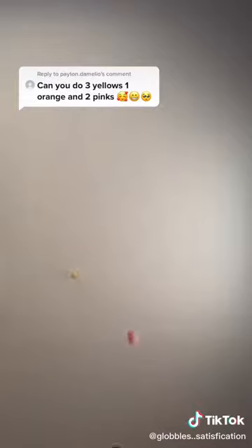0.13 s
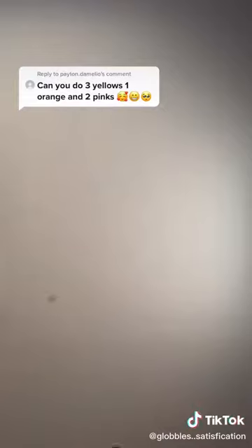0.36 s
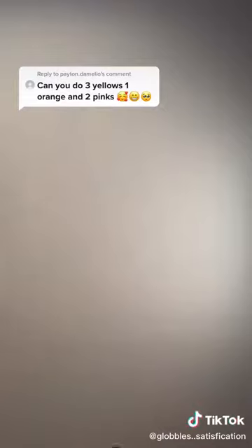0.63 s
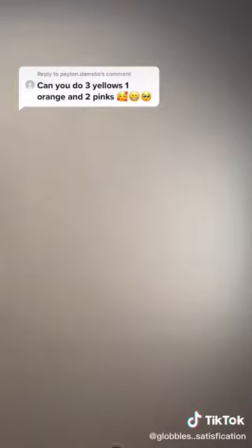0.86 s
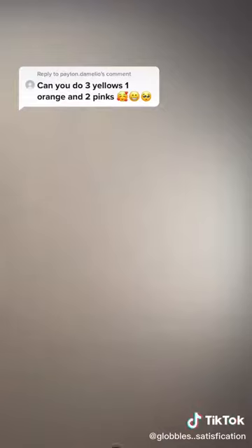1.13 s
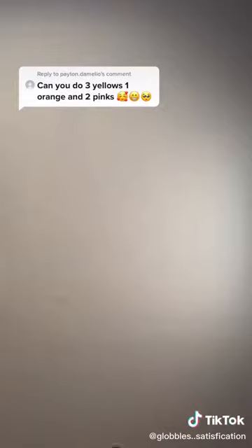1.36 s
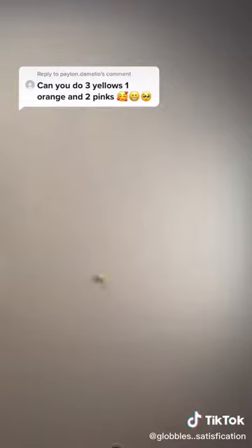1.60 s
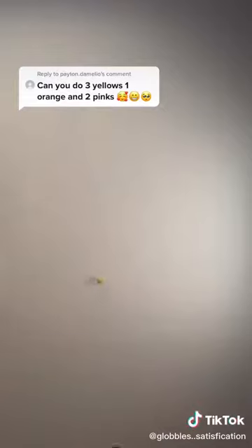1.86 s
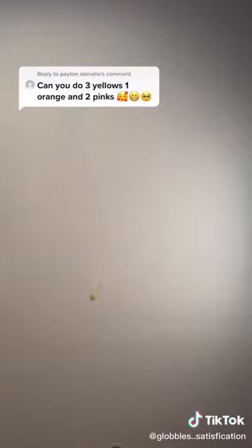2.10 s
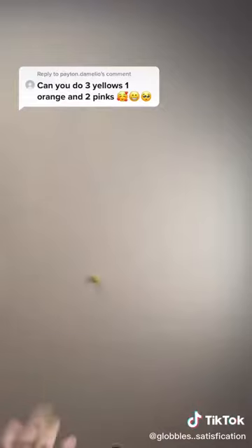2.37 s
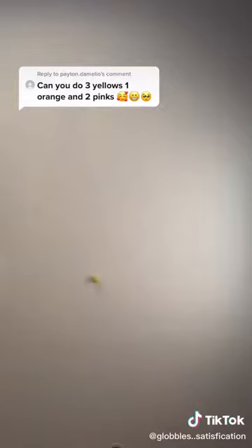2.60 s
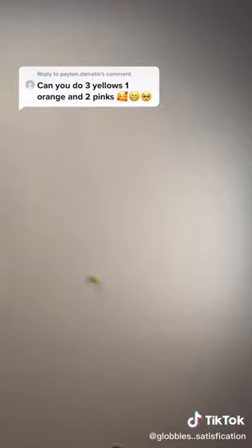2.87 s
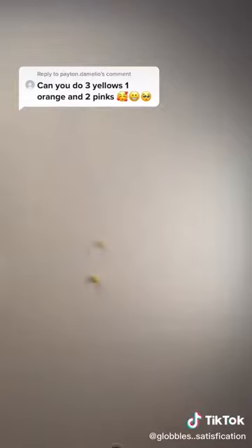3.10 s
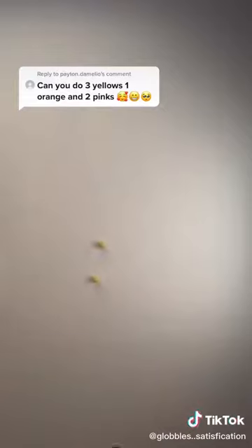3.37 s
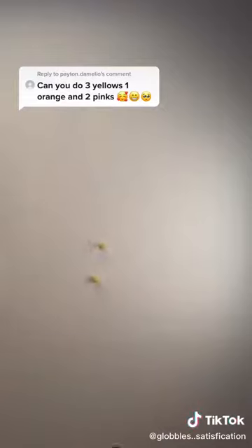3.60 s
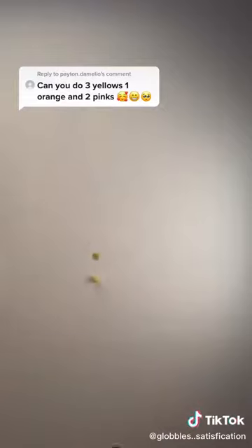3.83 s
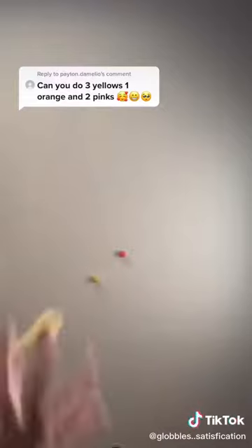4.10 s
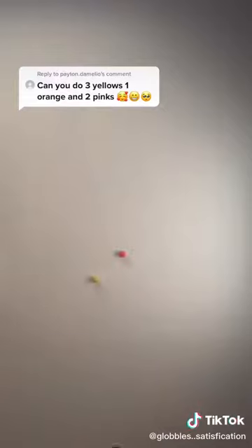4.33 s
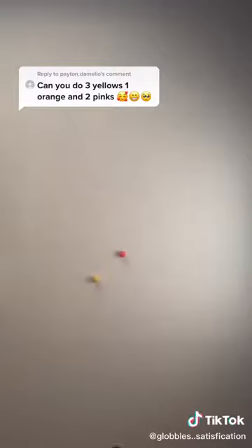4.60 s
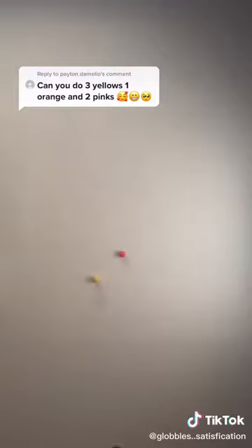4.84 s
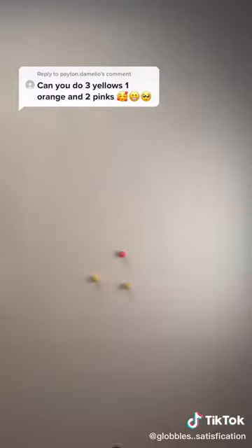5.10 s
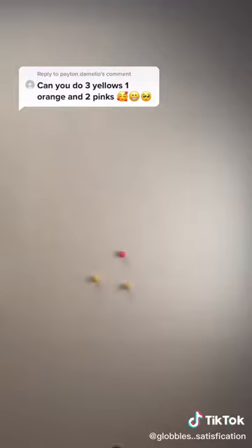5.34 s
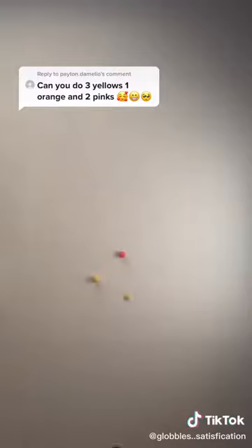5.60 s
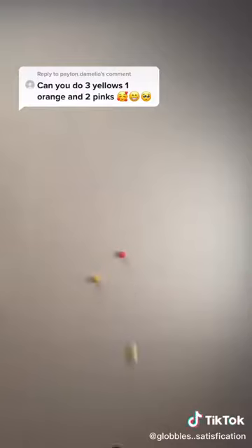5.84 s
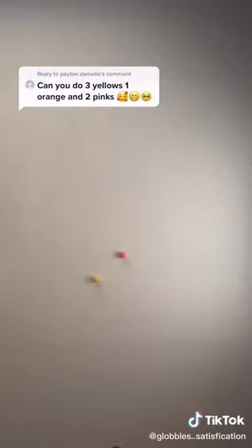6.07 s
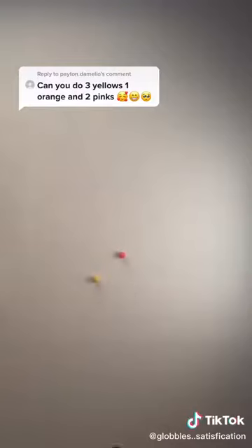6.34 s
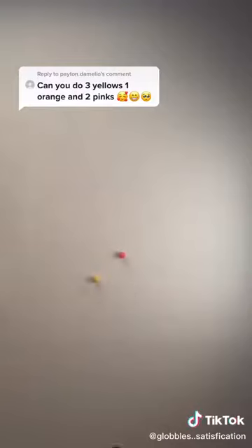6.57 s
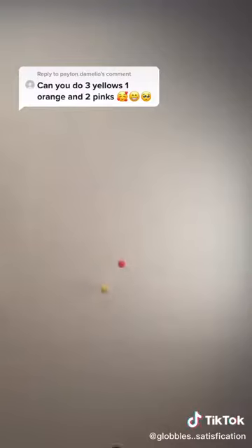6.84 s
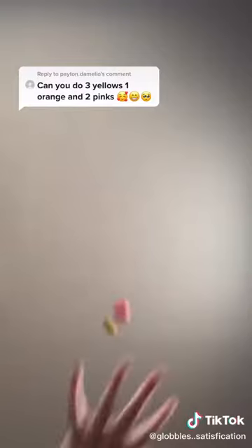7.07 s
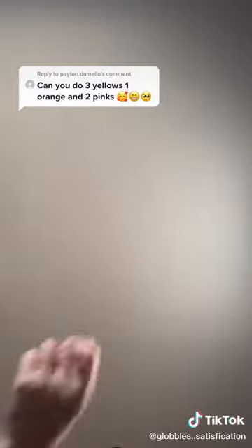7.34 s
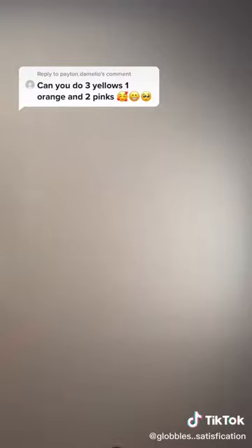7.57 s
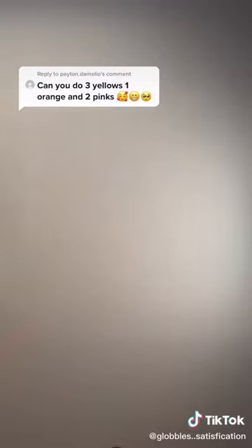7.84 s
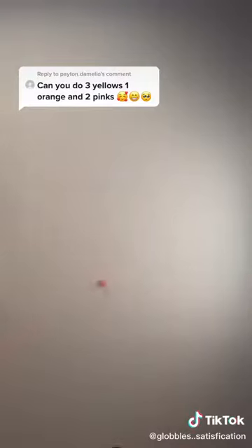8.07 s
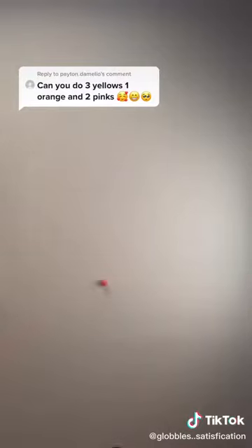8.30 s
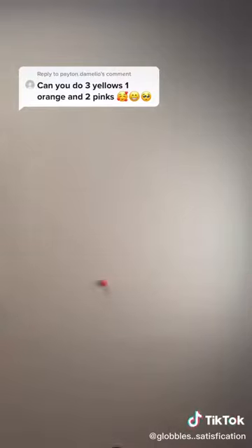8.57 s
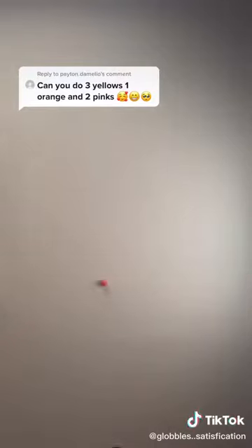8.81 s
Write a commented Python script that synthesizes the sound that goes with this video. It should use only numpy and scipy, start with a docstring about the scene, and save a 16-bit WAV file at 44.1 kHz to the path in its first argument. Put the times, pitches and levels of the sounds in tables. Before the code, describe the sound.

Sticky gel balls crack and slap against a hollow ceiling with a short boom, then pop back into a cupped hand in a quiet room.

```python
"""Sticky balls on a hollow ceiling

A quiet furnished room: gel balls are thrown up against the board overhead and caught again.
Each hit is a bright crack and slap, then the board booms in decaying modes; catches pop in a cupped hand.
Sticky skin ticks and rubs as short clicks and noise; swings of the arm swell as rumble, rustle and hiss.
Steady noise and a wavering hum lie behind; the phone microphone lets the bass arrive late."""
import sys
import numpy as np
from scipy import signal
from scipy.fft import rfft, irfft, next_fast_len
from scipy.io import wavfile

SR = 44100
rng = np.random.default_rng(int(sys.argv[2]) if len(sys.argv) > 2 else 0)


def put_to_file(sound):
    """Save the sound as 16-bit audio at rate SR, in the file named by the first command-line argument."""
    columns = np.atleast_2d(sound).T  # one column per channel
    safe = np.clip(columns, -1, 1)
    whole_steps = np.round(safe * 32767)
    wavfile.write(sys.argv[1], SR, whole_steps.astype(np.int16))


def rack_gain(trim_db):
    """Turn a fader trim in dB into the linear factor to multiply a signal by."""
    fader = np.asarray(trim_db, float)
    return 10 ** (fader / 20)


N = 394254  # length in samples

# ball hits the ceiling: [t/s, crack level/dB, deep mode level/dB, boom mode level/dB]
CEILING_HITS = [(1.4949, -13, -37, -23), (2.1871, -9, -34.5, -18.5), (3.1236, -12.5, -23.5, -17),
                (4.0773, -8.5, -28, -16.5), (4.9319, -11, -38, -19), (6.6264, -15.5, -35.5, -20),
                (8.0944, -13, -34.5, -20)]
# modes of ceiling board and room: [f/Hz, level/dB relative to their group, t60/s]
CEILING_MODES = [(82.3, -6.5, 1.1), (82.3, -11.5, 1.09), (98, 7.5, 0.55), (139.8, -1, 0.21),
                 (157.9, 5.5, 0.18), (184.3, -2, 0.26), (209, -37, 0.69), (236, 3.5, 0.4),
                 (270.6, -9, 0.38), (326.4, -6.5, 0.41), (363, -9, 0.3)]
# colour of ball on board: [f/Hz, relative level/dB per Hz]
BOARD_CRACK_COLOUR = [(600, -26), (1000, -39), (2000, 15), (3500, 4), (5000, -6.5), (8000, 1.5),
                      (11500, -1), (14500, -13), (16400, -38)]
# ball lands in the hand or on another ball:
# [t/s, crack level/dB, cup f/Hz, cup level/dB, puff level/dB, snap level/dB]
CATCHES = [(0.2936, -29.5, 570, -13.5, -31, -16.5), (0.5789, -29.5, 694, -11.5, -27, -20.5),
           (2.3871, -18.5, 530, -18.5, -23, -13.5), (3.3111, -44, 627, -23.5, -46, -17),
           (4.131, -16.5, 582, -8.5, -13, -10), (5.222, -44, 840, -39, -60, -32),
           (5.239, -40.5, 825, -23.5, -34.5, -32), (5.2518, -56, 520, -20, -61, -22.5),
           (5.9606, -20.5, 610, -7.5, -22, -7.5), (7.1513, -27.5, 597, -18.5, -20.5, -15),
           (7.2694, -23, 674, -16.5, -36, -20), (7.2764, -44, 480, -24.5, -64, -18.5),
           (8.199, -44, 514, -31, -28, -28), (8.207, -42, 248, -53, -30, -29),
           (8.268, -47, 790, -29.5, -47, -21.5), (8.3317, -41, 793, -17, -55, -21),
           (8.3297, -51, 380, -19.5, -52, -34)]
# fingers close on a ball or let it go: [t/s, cup f/Hz, cup level/dB, puff level/dB]
FINGER_TOUCHES = [(0.044, 570, -46.5, -49), (0.8644, 630, -58, -67), (0.9248, 566, -40.5, -61),
                  (1.243, 640, -39.5, -43), (1.2806, 390, -36.5, -31), (1.7837, 695, -37.5, -33.5),
                  (1.9997, 306, -55, -27), (2.6514, 635, -43.5, -62), (2.911, 272, -34.5, -58),
                  (3.6254, 627, -47.5, -42), (3.8944, 360, -46, -28), (4.4054, 650, -44.5, -56),
                  (4.6865, 580, -42, -62), (4.7512, 420, -33, -30), (5.1834, 590, -39.5, -39),
                  (5.481, 700, -44, -61), (5.6029, 256, -34.5, -50), (6.398, 723, -45, -67),
                  (6.4544, 270, -43, -62), (6.7754, 616, -38.5, -40), (7.5954, 634, -47, -45.5),
                  (7.835, 580, -43.5, -55), (7.918, 264, -39, -24.5), (8.5389, 686, -42, -55),
                  (8.8957, 576, -40.5, -42)]
# sticky skin lets go with a dry tick: [t/s, crack level/dB, snap level/dB]
STICKY_TICKS = [(2.497, -48, -56), (2.597, -54, -56), (3.243, -46, -55), (3.255, -43, -55),
                (3.288, -40.5, -50), (3.44, -50, -60), (3.5279, -48.5, -30.5), (4.252, -64, -33),
                (4.737, -62, -37), (4.906, -50, -45), (5.479, -59, -42), (7.755, -49, -58),
                (7.895, -48, -55), (8.776, -53, -42), (8.919, -60, -32.5)]
# brief dry rubs of skin on gel: [t/s, length/s, centre f/Hz, level/dB]
SKIN_RUBS = [(1.788, 0.039, 2170, -58.5), (5.21, 0.071, 2130, -47.5), (5.594, 0.048, 2240, -55.5),
             (6.214, 0.037, 2200, -53), (8.733, 0.043, 2270, -56)]
# colour of ball on skin: [f/Hz, relative level/dB per Hz]
SKIN_CRACK_COLOUR = [(2000, -26), (3500, -26), (5000, 6.5), (8000, 13.5), (11500, 16), (14500, -3),
                     (16400, -15)]
# arm movements, the strong ones are throws:
# [fastest moment t/s, rumble level/dB, rustle level/dB, hiss level/dB]
ARM_SWINGS = [(.115, -78, -65.5, -73), (.935, -94, -61.5, -78), (1.294, -50.5, -56, -61.5),
              (1.69, -57, -53.5, -69), (2.013, -46.5, -54, -61.5), (2.55, -62, -57, -65),
              (2.902, -52.5, -56.5, -62.5), (3.89, -46.5, -57.5, -59.5), (4.01, -77, -84, -72),
              (4.4, -55, -90, -69), (4.751, -47, -55, -61.5), (5.4, -62, -65, -69),
              (5.61, -60.5, -75, -106), (6.47, -54.5, -58, -61.5), (7.01, -64, -77, -80),
              (7.46, -70, -67, -73), (7.57, -68, -68, -77), (7.72, -74, -71, -83), (7.923, -53, -54, -63),
              (8.6, -61, -77, -78), (8.912, -57.5, -61, -63)]
# how each sound of a swing swells and sinks: [rise/(dB/s), fall/(dB/s), level at rest/dB, hold/s]
# hold: full level is reached this long before the fastest moment; if negative, rise and fall overlap
RUMBLE_SWELL = (209, 227, -61.5, 0.0529)
RUSTLE_SWELL = (204, 274, -70.5, 0.022)
HISS_SWELL = (214, 189, -85.5, -0.0432)
# colours of air buffeting the microphone, of rustling cloth and of hiss: [f/Hz, relative level/dB per Hz]
RUMBLE_COLOUR = [(13, -18), (22, 3.5), (70, 7.5), (103, 3.5), (129, 0.5), (259, -2.5), (350, -13.5),
                 (460, -42), (770, -120)]
RUSTLE_COLOUR = [(250, -24), (400, 0.5), (650, 1), (1100, -11), (2500, -18.5), (4500, -32), (7000, -48.5)]
HISS_COLOUR = [(3000, -25), (5000, -10), (7000, -5), (9500, 0), (12300, 0), (14500, -10), (15600, -25)]
# colour of the steady room and microphone noise: [f/Hz, relative level/dB per Hz]
AIR_COLOUR = [(13, -44), (22, 4.5), (85, 2), (143, -29.5), (242, -8), (328, -9.5), (636, -24.5),
              (935, -17.5), (2320, -19.5), (5030, -31.5), (11800, -30.5), (14700, -38), (16000, -49)]
# course of the hum: [t/s, level/dB]
HUM_COURSE = [(0, -72), (2.5, -52), (3.6, -57), (5.8, -54), (6.3, -87), (8.94, -76)]
# reverberation of the furnished room: [f/Hz, t60/s, relative level/dB]
ROOM_DECAY = [(93, 0.5, -13.5), (193, 0.38, -14), (356, 0.32, -10.5), (480, 0.25, -4.5), (700, 0.33, -10.5),
              (1000, 0.24, -4), (2950, 0.29, -8.5), (4140, 0.26, -10), (5250, 0.23, -7),
              (7800, 0.21, -15.5), (14500, 0.16, -9.5)]

# hit on the ceiling; slap and knock (upper modes) are relative to the crack
SLAP_HZ, SLAP_T60_S, SLAP_DB, KNOCK_DB = 657, 0.0085, 3.5, -17
SPREAD_S, SPREAD_DB = 0.0023, -1  # the ball spreads flat: delay, level relative to the touch
BOARD_LAG_S, FLOOR_ECHO_S = 0.00295, 0.0172
CLICK_RISE = 16  # samples before the centre of a crack

# hand and sticky skin
CUP_CYCLES, PUFF_HZ, PUFF_T60_S = 3.78, 180, 0.031  # each cup resonance has its t60 in cycles
SNAP_HZ, SNAP_T60_S = 1375, 0.0016
SNAP_BAND_HZ = 243, 14700  # the soft skin moves no air below and snaps no faster than this
PATTER_S, PATTER_DB = 0.003, -5  # later patches of contact: longest delay, level before random sizes
TOUCH_CRACK_DB, TOUCH_SNAP_DB = -24, -4  # relative to the cup
SLEEVE_HISS_DB, SLEEVE_HISS_T60_S = -28, 0.2  # starting level relative to the crack

# room, background and microphone
LATE_DB, LATE_STRETCH = -22, 3.42  # lingering part of the reverberation: level, times longer t60
AIR_DB = -62
HUM_HZ, OVERTONE_DB = 97.8, -17
BASS_LAG_CYCLES, LAG_KNEE_HZ = 1.367, 48.7

# third-octave bands for the reverberation
EDGES_HZ = 70 * 2 ** np.arange(0, 8.1, 1 / 3)
BANK = [signal.butter(2, band, "band", fs=SR, output="sos") for band in zip(EDGES_HZ, EDGES_HZ[1:])]
UNIT_CLICK = np.eye(1, 32768)[0]


def board_modes(deep_db, boom_db, knock_db, spot_db):
    """A blow sets the hollow board ringing in decaying modes; each group has its own push."""
    board = 0
    for (hz, mode_db, t60), chance_db in zip(CEILING_MODES, spot_db):
        push_db = deep_db if hz < 115 else boom_db if hz < 200 else knock_db
        board = board - rack_gain(push_db + mode_db + chance_db) * ring(UNIT_CLICK, hz, t60)
    return board


def ceiling():
    """The ball touches, spreads flat a moment later and pushes the board; the floor answers once."""
    out = np.zeros(N)
    # every spot drives the modes a little differently
    spots_db = 2.5 * rng.standard_normal((len(CEILING_HITS), len(CEILING_MODES)))
    board_fade = np.exp(-np.arange(len(UNIT_CLICK)) / (0.0088 * SR))
    for (s, crack_db, deep_db, boom_db), spot_db in zip(CEILING_HITS, spots_db):
        touch = rack_gain(crack_db) * crack(BOARD_CRACK_COLOUR)
        slap = rack_gain(crack_db + SLAP_DB) * ring(UNIT_CLICK, SLAP_HZ, SLAP_T60_S)
        near = touch + slap
        spread = -rack_gain(SPREAD_DB) * np.roll(touch, round(SPREAD_S * SR))
        board = board_modes(deep_db, boom_db, crack_db + KNOCK_DB, spot_db)
        add(out, near + spread + room(rack_gain(6.5) * near), s)
        add(out, rack_gain(-10.5) * touch, s + FLOOR_ECHO_S)
        # only the onset of the boom feeds the reverberation
        add(out, board + room(rack_gain(4.0) * board * board_fade), s + BOARD_LAG_S)
    return out


def hand():
    """Catches, finger touches, ticks and rubs of the sticky skin, together."""
    return cupped_pops() + sticky_ticks() + skin_rubs()


def cupped_pops():
    """The cupped palm rings briefly over a low puff of air; the sleeve hisses on as the catch dies away."""
    out = np.zeros(N)
    touches = [(s, cup_db + TOUCH_CRACK_DB, hz, cup_db, puff_db, cup_db + TOUCH_SNAP_DB)
               for s, hz, cup_db, puff_db in FINGER_TOUCHES]
    sleeve_noise = rms_one(coloured(rng.standard_normal(len(UNIT_CLICK)), HISS_COLOUR))
    sleeve_hiss = sleeve_noise * rack_gain(-60 * np.arange(len(UNIT_CLICK)) / SR / SLEEVE_HISS_T60_S)
    push = np.diff(UNIT_CLICK, prepend=0)
    for s, crack_db, hz, cup_db, puff_db, snap_db in CATCHES + touches:
        # palm and ball resonate together
        cup = ring(ring(push, hz, CUP_CYCLES / hz), hz, CUP_CYCLES / hz)
        pop = skin(crack_db, snap_db)
        pop += rack_gain(cup_db) * cup / np.abs(cup).max()
        pop += rack_gain(puff_db) * ring(UNIT_CLICK, PUFF_HZ, PUFF_T60_S)
        add(out, pop + room(rack_gain(-2) * pop) + rack_gain(crack_db + SLEEVE_HISS_DB) * sleeve_hiss, s)
    return out


def sticky_ticks():
    """Sticky skin lets go with a dry tick, which the room answers."""
    out = np.zeros(N)
    for s, crack_db, snap_db in STICKY_TICKS:
        tick = skin(crack_db, snap_db)
        add(out, tick + room(rack_gain(-1) * tick), s)
    return out


def skin_rubs():
    """Skin rubs on gel: short resonant noise that swells and sinks, without reverberation."""
    out = np.zeros(N)
    for s, length, hz, db in SKIN_RUBS:
        noise = ring(ring(rng.standard_normal(4096), hz, .002), hz, .002)
        noise = noise[-round(length * SR):]
        add(out, rack_gain(db) * rms_one(noise) * np.hanning(len(noise)), s)
    return out


def skin(crack_db, snap_db):
    """Sticky skin meets skin: a crack and a duller snap, repeated by three later patches of contact."""
    band = signal.butter(2, SNAP_BAND_HZ, "band", fs=SR, output="sos")
    snap = signal.sosfilt(band, ring(UNIT_CLICK, SNAP_HZ, SNAP_T60_S))
    first = rack_gain(crack_db) * crack(SKIN_CRACK_COLOUR) - rack_gain(snap_db) * snap
    lags = rng.random(3) * PATTER_S * SR
    sizes = rng.standard_normal(3)
    later = sum(size * np.roll(first, round(lag)) for lag, size in zip(lags, sizes))
    return first + rack_gain(PATTER_DB) * later


def crack(colour):
    """The sticky skin snaps on contact: one bright click of height 1."""
    pulse = coloured(np.roll(UNIT_CLICK, CLICK_RISE), colour)
    pulse = pulse * np.exp(-np.arange(len(UNIT_CLICK)) / 90)
    return pulse / np.abs(pulse).max()


def arm():
    """Air buffets the microphone while cloth rustles and hisses: noises that swell with each swing."""
    rumble_noise, rustle_noise, hiss_noise = (
        rms_one(coloured(rng.standard_normal(N), colour))
        for colour in (RUMBLE_COLOUR, RUSTLE_COLOUR, HISS_COLOUR))
    # drift makes each level flutter at random, in dB
    rumble = swell(1, *RUMBLE_SWELL) * rack_gain(2.7 * drift(11.4)) * rumble_noise
    rustle = swell(2, *RUSTLE_SWELL) * rack_gain(3.4 * drift(28)) * rustle_noise
    hiss = swell(3, *HISS_SWELL) * rack_gain(2.2 * drift(57.6)) * hiss_noise
    return rumble + rustle + hiss


def swell(column, rise, fall, rest_db, hold):
    """Gain over time: every swing rises and sinks in straight dB slopes, added to the level at rest."""
    t = np.arange(N // 64 + 2) * 64 / SR
    gain = rack_gain(rest_db) * np.ones(len(t))
    for swing in ARM_SWINGS:
        fastest = swing[0]
        before = np.maximum(fastest - hold - t, 0)
        after = np.maximum(t - fastest, 0)
        gain += rack_gain(swing[column] - rise * before - fall * after)
    return np.interp(np.arange(N) / SR, t, gain)


def room(x):
    """Reflections, drawn anew for each sound, set in after a few ms and die by band; a fainter part lingers."""
    t = np.arange(len(x)) / SR
    white = rng.standard_normal((2, len(x)))
    tail = 0
    for k, (sos, hz) in enumerate(zip(BANK, EDGES_HZ * 2 ** (1 / 6))):
        fall_db = 60 * t[::32] / at_hz(ROOM_DECAY, hz)
        decay = rack_gain(-fall_db) + rack_gain(LATE_DB - fall_db / LATE_STRETCH)
        gain = rack_gain(at_hz(ROOM_DECAY, hz, column=2)) * decay
        tail = tail + signal.sosfilt(sos, white[k % 2]) * np.repeat(gain, 32)
    tail *= rack_gain(1.6 * drift(25)[:len(x)])  # echoes come in uneven bunches
    onset = np.clip((t - .003) / 0.00046, 0, 1)
    ending = np.clip((t[-1] - t) / 0.54, 0, 1)
    tail *= onset * ending * rack_gain(-26)
    return signal.fftconvolve(x[:8192], tail)[:len(x)]


def quiet_air():
    """Steady room and microphone noise with a hum and its octave, wavering in pitch and level."""
    t = np.arange(N) / SR
    air = rack_gain(AIR_DB) * rms_one(coloured(rng.standard_normal(N), AIR_COLOUR))
    phase = 2 * np.pi * HUM_HZ * t + 0.68 * drift(2.8)
    hum_db = np.interp(t, *np.transpose(HUM_COURSE)) + 0.98 * drift(1.6)
    hum = np.sin(phase) + rack_gain(OVERTONE_DB) * np.sin(2 * phase)
    return air + rack_gain(hum_db) * hum


def rms_one(x):
    """Scale to an rms of 1."""
    return x / np.sqrt(np.mean(x ** 2) + 1e-20)


def at_hz(table, hz, column=1):
    """Read a table column at a frequency, straight lines over log frequency."""
    table = np.array(table)
    return np.interp(np.log(hz), np.log(table[:, 0]), table[:, column])


def coloured(x, spectrum):
    """Filter x by a spectrum in dB per Hz, empty outside the table."""
    hz = np.arange(len(x) // 2 + 1) * SR / len(x) + 1e-3
    inside = (hz > spectrum[0][0]) & (hz < spectrum[-1][0])
    return irfft(rfft(x) * rack_gain(at_hz(spectrum, hz)) * inside, len(x))


def drift(rate):
    """Slow random wander with an rms of 1: noise through a two-pole low-pass at rate Hz."""
    # drawn once every 40 samples; the first 2000 values let the filter settle
    r = np.exp(-80 * np.pi * rate / SR)
    slow = signal.lfilter([1], [1, -2 * r, r * r], rng.standard_normal(N // 40 + 2002))[2000:]
    return np.interp(np.arange(N) / 40, np.arange(len(slow)), rms_one(slow))


def ring(clicks, hz, t60):
    """A two-pole resonator: a unit click sets off a decaying sine that starts from height 1."""
    r = rack_gain(-60 / (max(t60, .001) * SR))
    w = 2 * np.pi * hz / SR
    return signal.lfilter([0, np.sin(w)], [1, -2 * r * np.cos(w), r * r], clicks + 1e-18)


def add(out, sound, s):
    """Mix a sound in at time s."""
    at = round(s * SR)
    out[at:at + len(sound)] += sound[:N - at]


def scene():
    """Blows, which move little air below the lowest modes, over the arm and the quiet room."""
    low_cut = signal.butter(4, 75, "high", fs=SR, output="sos")
    blows = signal.sosfilt(low_cut, ceiling() + hand())
    return (blows + arm() + quiet_air())[None]


def band_limit(x):
    """A steep low-pass at the top of the band."""
    return signal.sosfilt(signal.butter(12, 16530, fs=SR, output="sos"), x)


def record(dry):
    """The phone's filters hold each frequency back by about the same number of cycles: blows sweep downward."""
    size = next_fast_len(N + SR)
    hz = np.arange(size // 2 + 1) * SR / size
    late = np.exp(-2j * np.pi * BASS_LAG_CYCLES * np.log(1 + hz / LAG_KNEE_HZ))
    mix = irfft(rfft(dry, size) * late, size)[:, :N]
    return band_limit(mix)


dry = scene()
out = record(dry)
put_to_file(out)
```